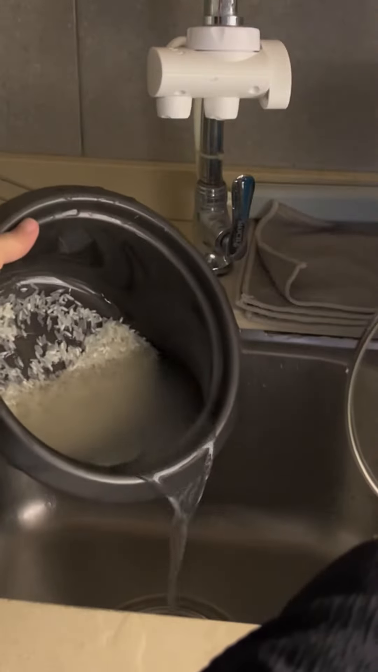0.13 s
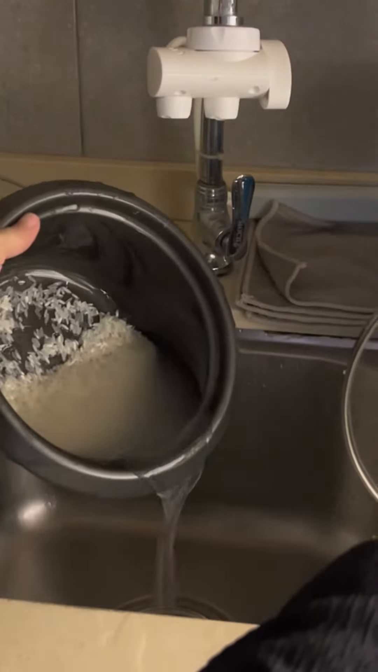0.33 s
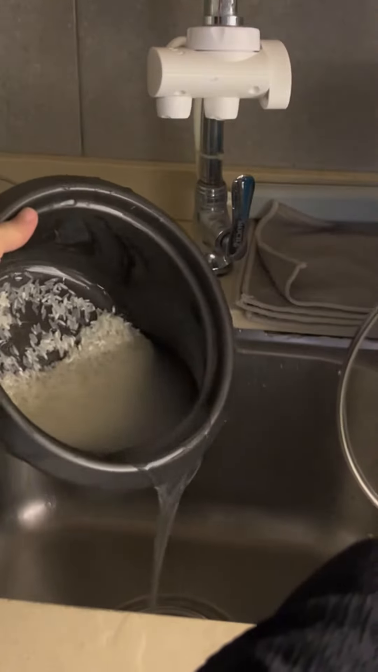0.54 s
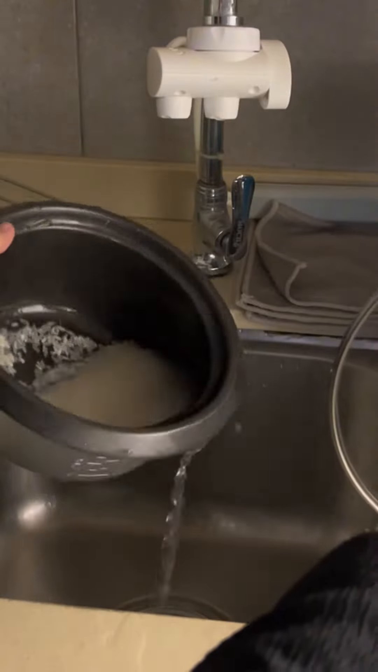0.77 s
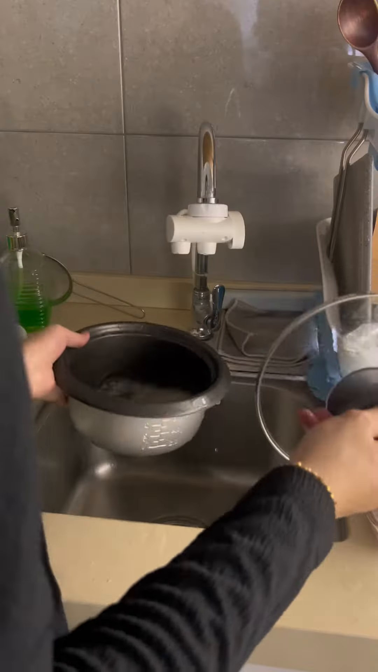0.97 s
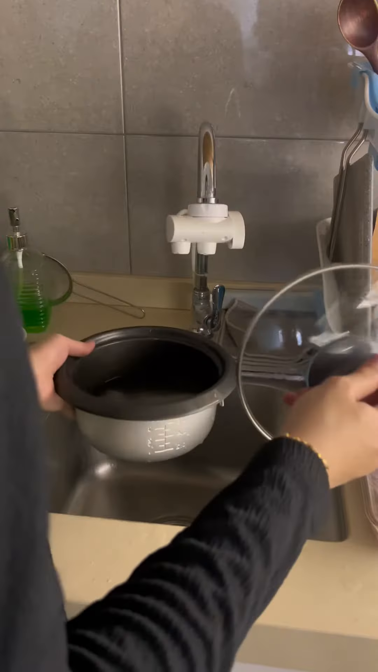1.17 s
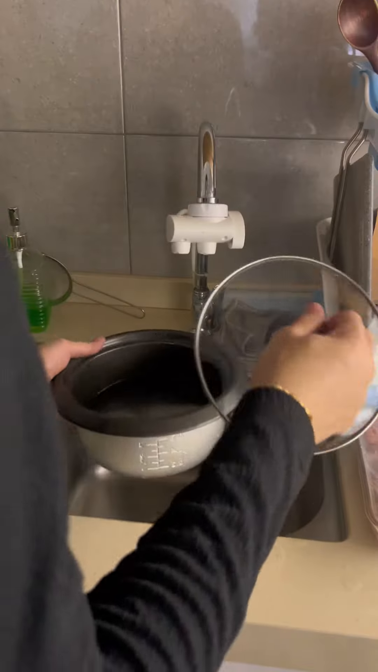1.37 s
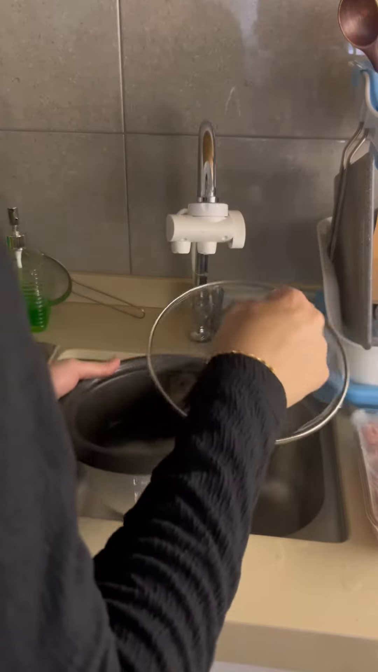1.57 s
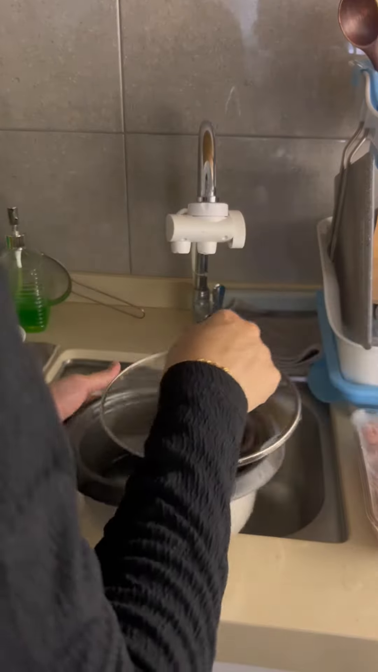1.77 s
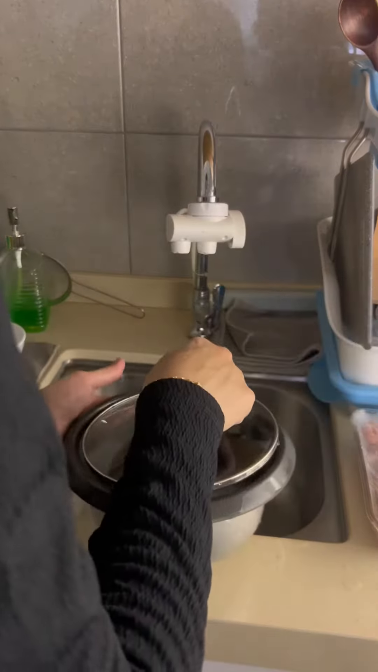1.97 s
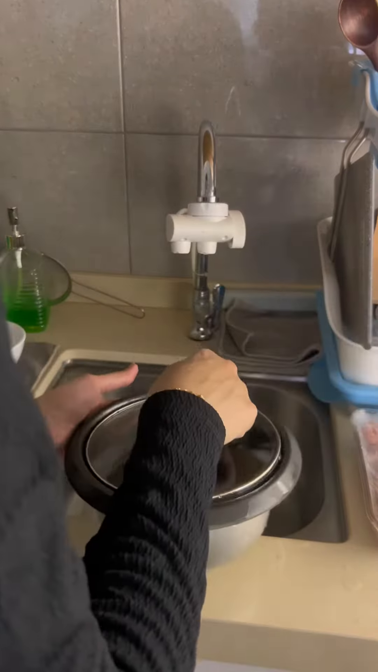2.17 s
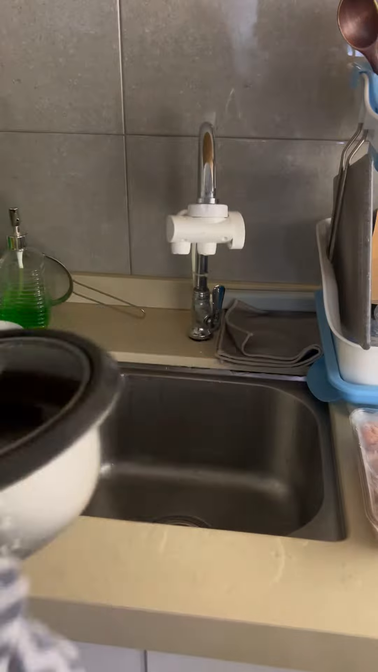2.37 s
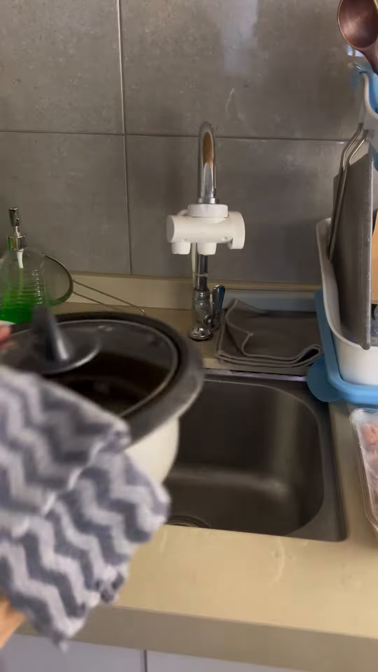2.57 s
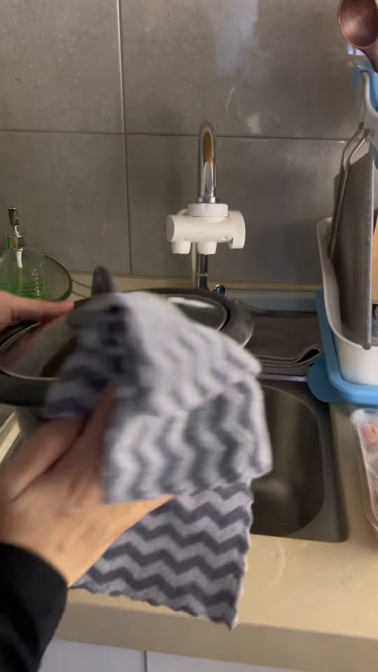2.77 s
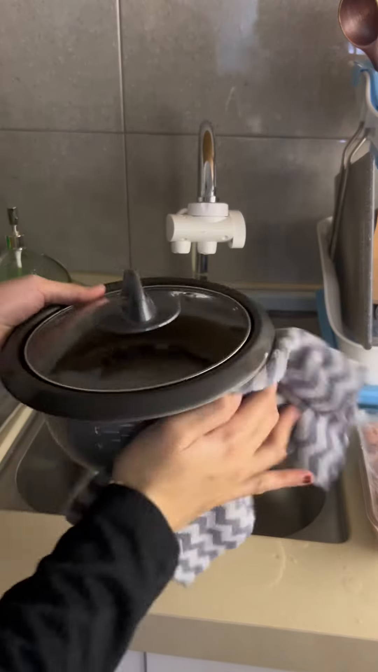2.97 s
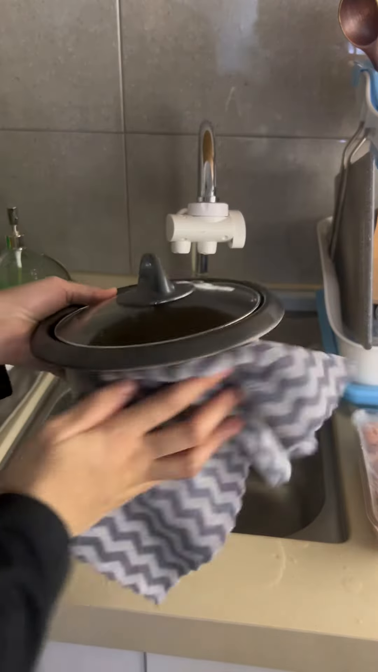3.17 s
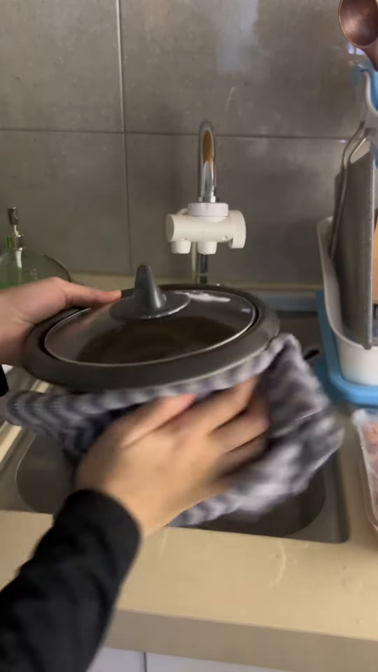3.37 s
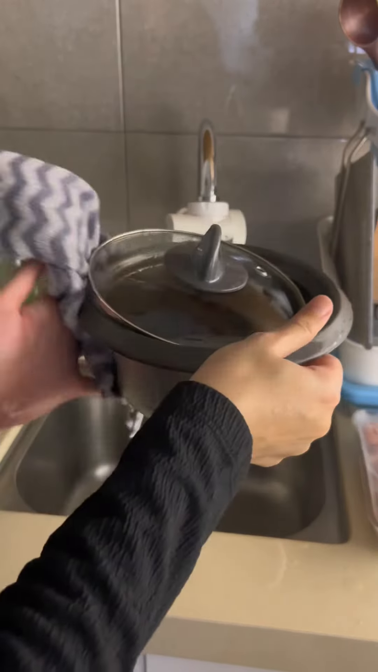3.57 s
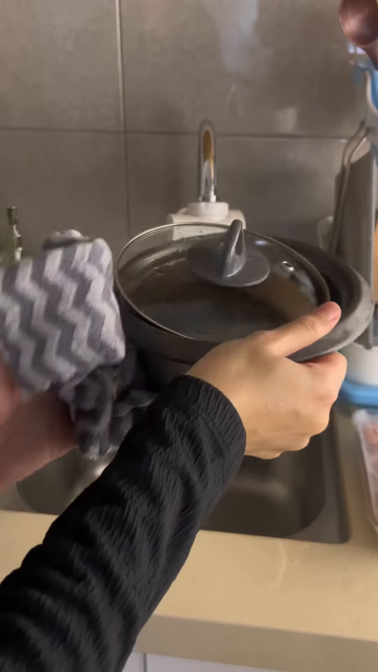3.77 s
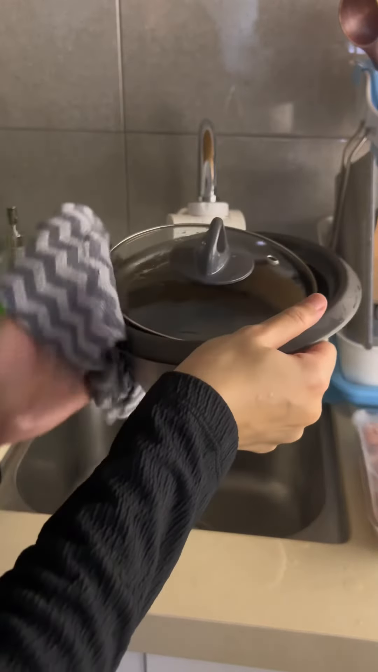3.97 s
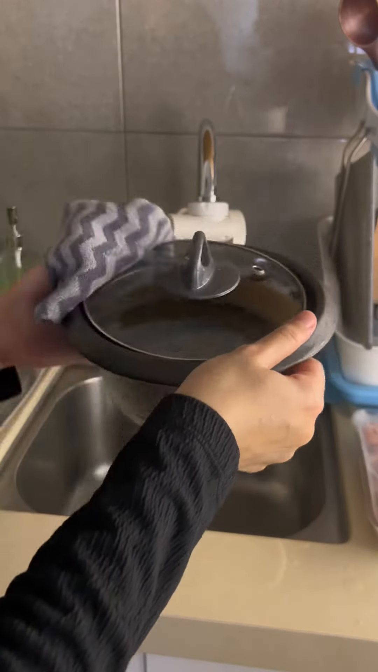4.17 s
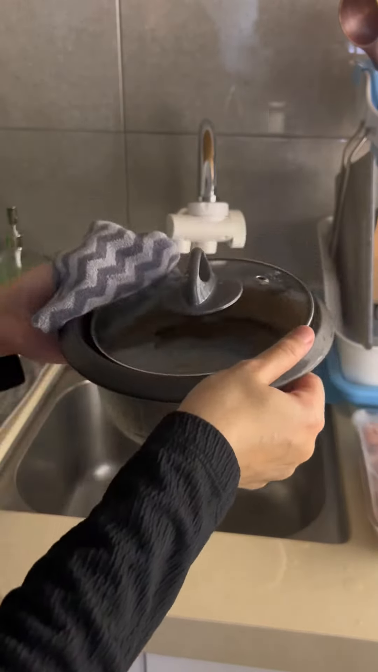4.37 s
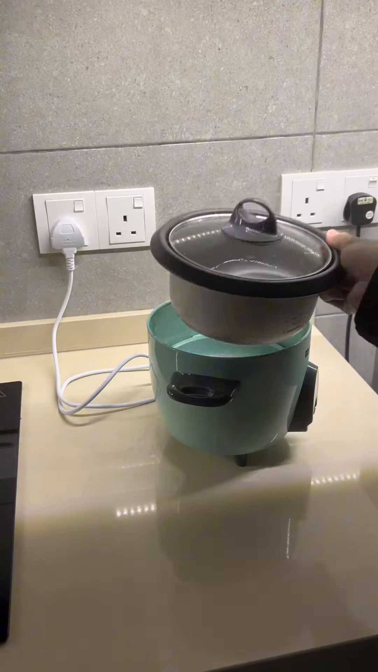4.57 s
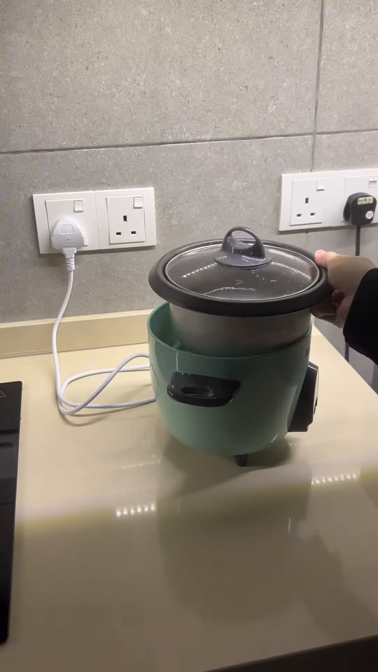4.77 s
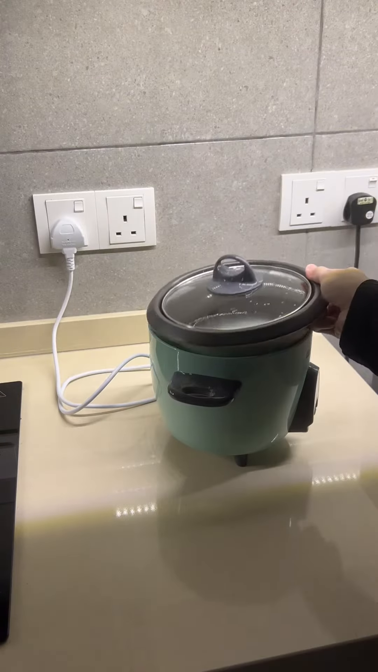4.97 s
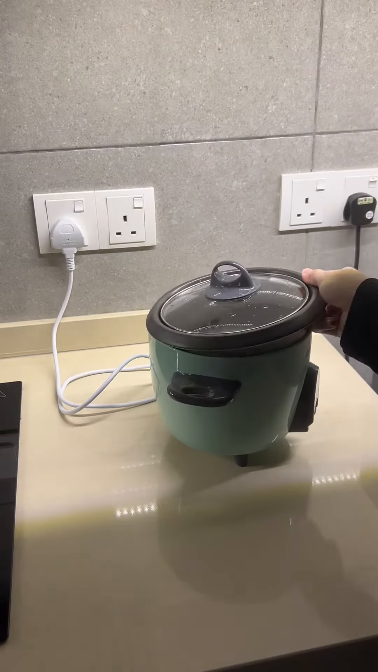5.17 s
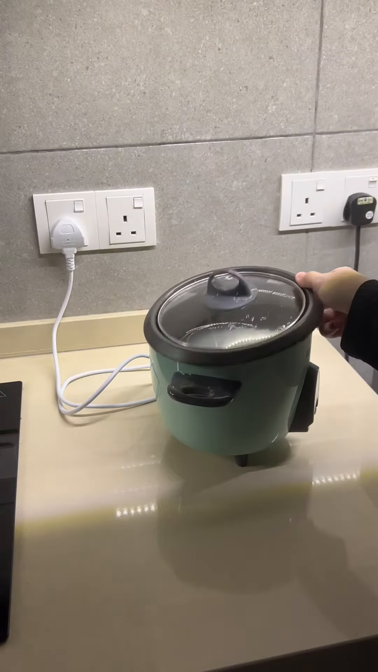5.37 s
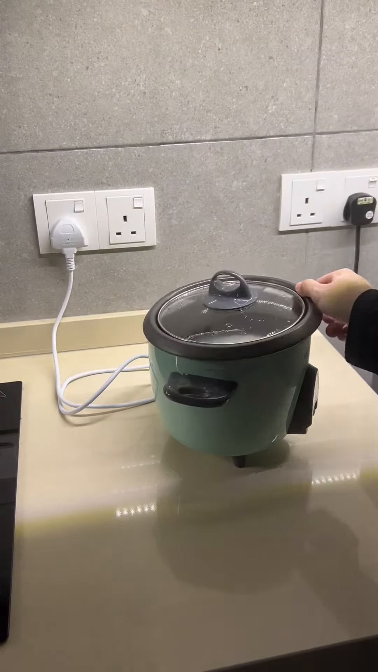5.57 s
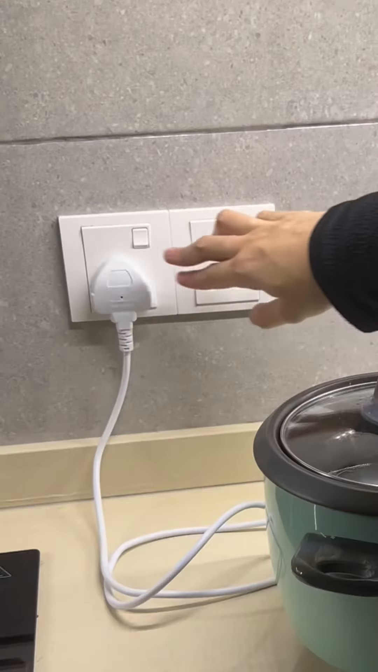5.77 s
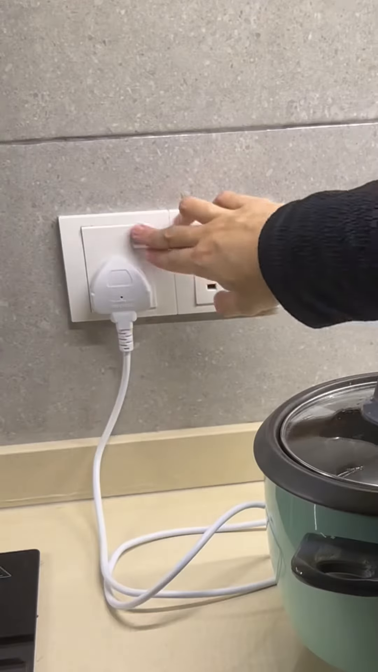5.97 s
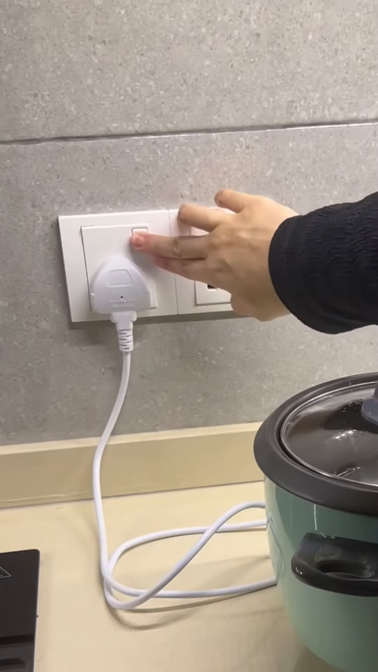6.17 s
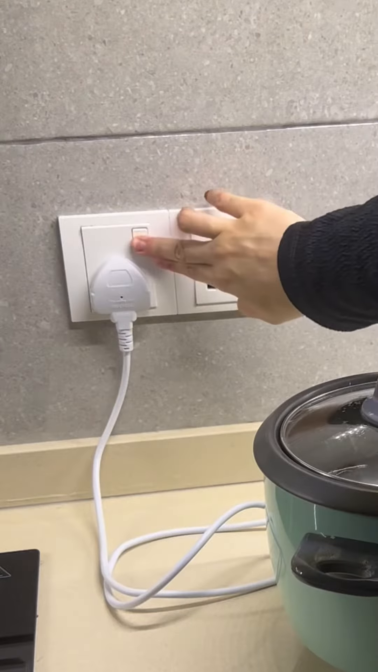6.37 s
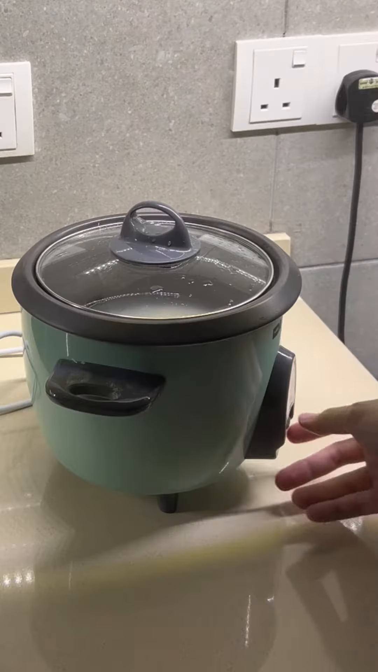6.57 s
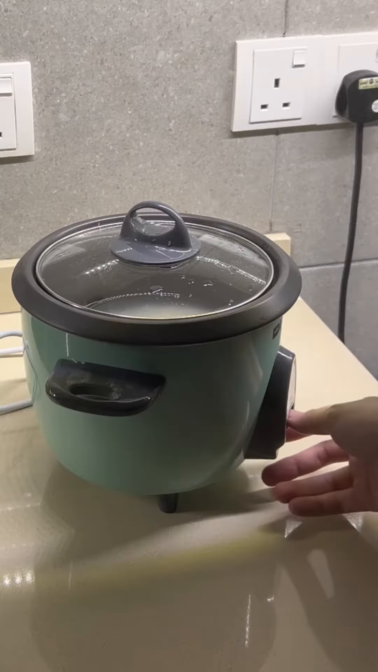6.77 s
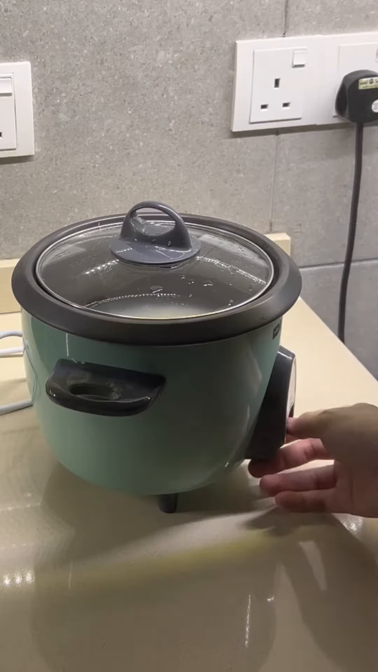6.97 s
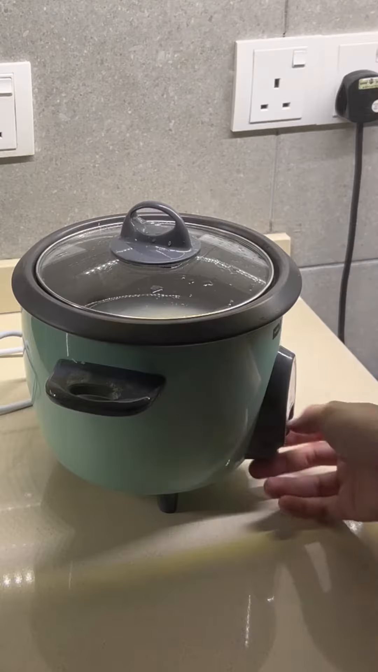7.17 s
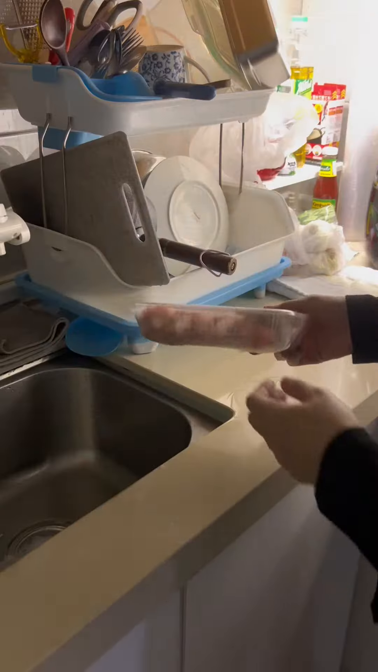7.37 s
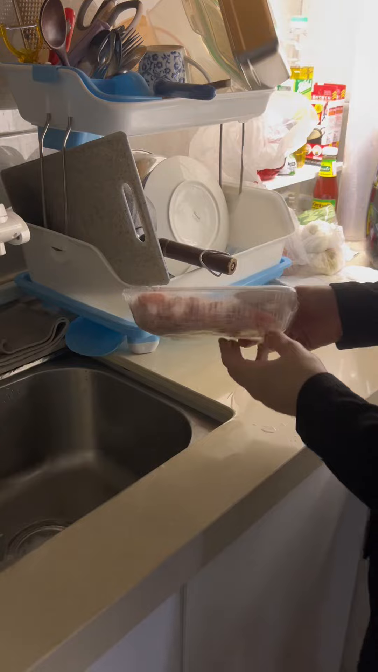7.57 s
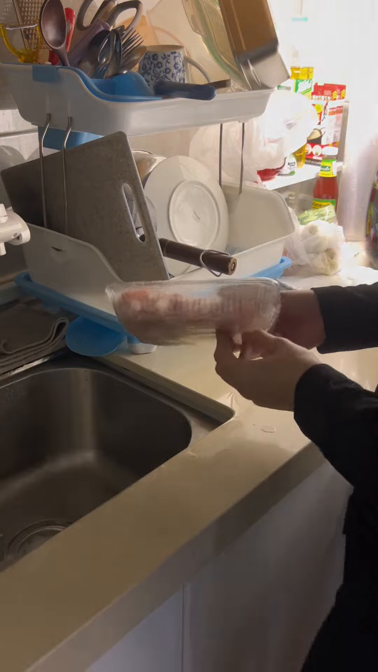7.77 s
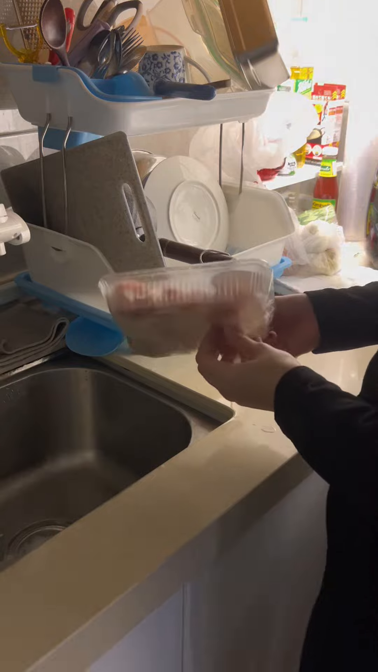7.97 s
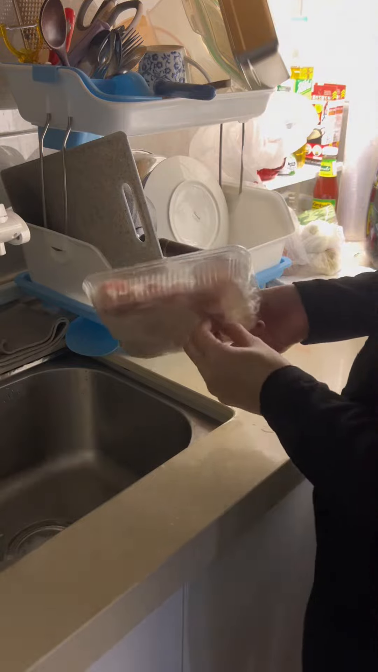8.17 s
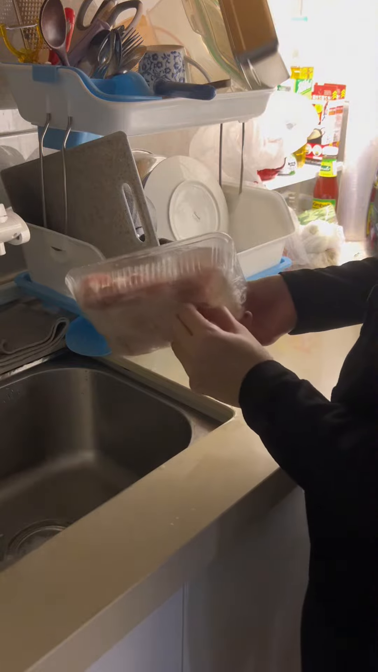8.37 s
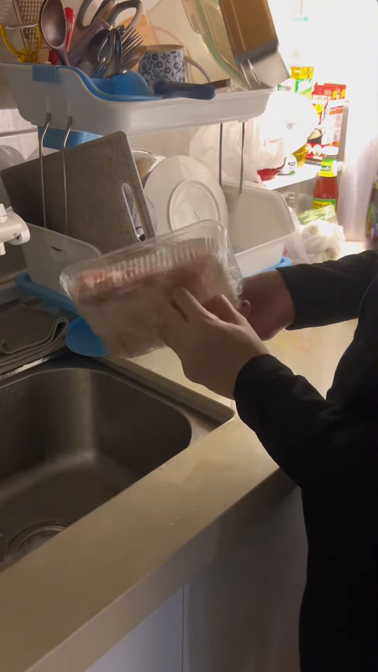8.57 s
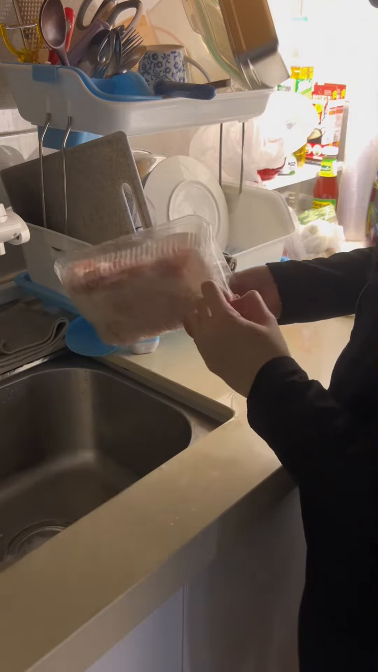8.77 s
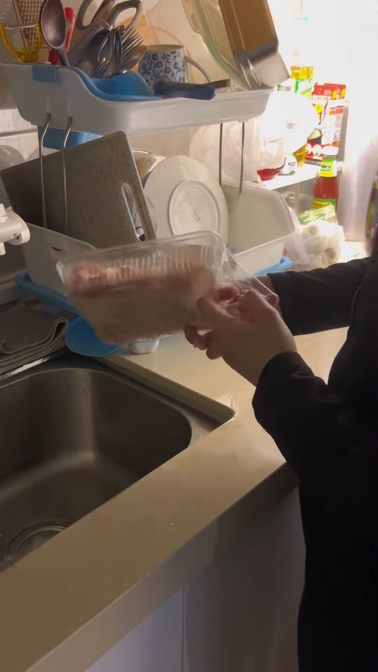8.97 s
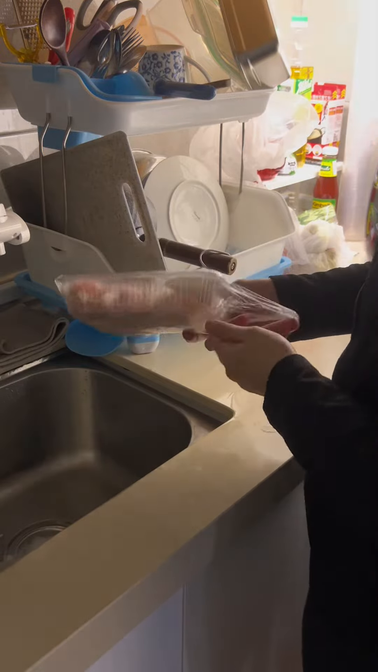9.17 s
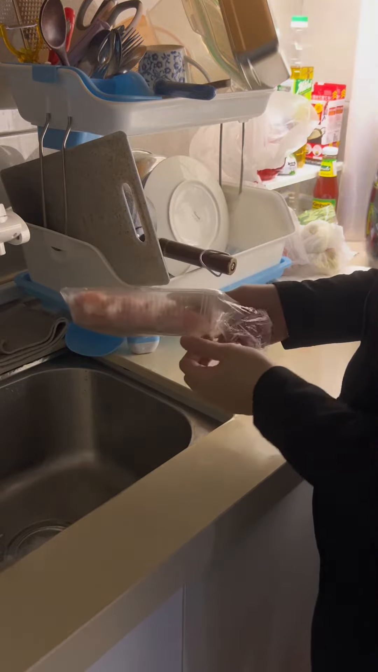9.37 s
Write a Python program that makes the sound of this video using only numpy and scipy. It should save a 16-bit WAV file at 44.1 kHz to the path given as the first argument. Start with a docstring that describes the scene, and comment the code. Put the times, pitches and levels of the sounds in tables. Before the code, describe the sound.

Water dribbles on steel with small bubbling plinks, then a glass lid taps and rings briefly on a metal pot. Soft towel brushing and a flick follow. The pot lands in its cooker with two heavy hollow metallic clatters and a tiny squeak. A sharp switch click, a lever clack and quiet crackly film wrap end it, recorded close over faint humming room air with abrupt background changes.

```python
"""A pot knocks down into its cooker: struck modes of pot, shell and hollow ring after noisy cracks.
Rice water pours into a steel sink (grains, drumming, bubbles), a glass lid rings on the rim, a towel wipes;
a wall switch snaps, the cooker's lever clacks and a film-wrapped tray rustles, as clicks, modes and grains.
A small tiled kitchen with a low hum, heard close from a hand-held microphone in stereo. Six times the
background steps to another level and whatever still rings stops."""
import sys
import numpy as np
from scipy import signal
from scipy.fft import rfft, irfft, next_fast_len
from scipy.io import wavfile
from scipy.ndimage import uniform_filter1d

SR = 44100
rng = np.random.default_rng(int(sys.argv[2]) if len(sys.argv) > 2 else 0)


def output_pcm(signal):
    """Save a mono or channel-first signal as 16-bit PCM at the path in sys.argv[1].

    Samples are clipped to [-1, 1] before scaling.
    """
    pcm = np.clip(np.atleast_2d(signal).T, -1, 1) * 32767
    wavfile.write(sys.argv[1], SR, np.round(pcm).astype(np.int16))


N = 415422
EDGE_HZ = 15800  # upper limit of the band

# stretches of unbroken time, with relative levels:
# (start t/s, room air level/dB, low hum level/dB, sway of the hand-held microphone level/dB)
TIME_STRETCHES = [(0, -44.5, -38, -52), (2.36, -45, -42, -45), (3.498, -45, -54, -48),
                  (4.408, -43.5, -48, -47), (5.679, -44, -45.5, -54.5), (6.469, -45, -66, -65),
                  (7.249, -44.5, -45, -51.5)]
# modes of the hollow between pot and shell: (f/Hz, level/dB, t60/s)
HOLLOW_MODES = [(376, -11, 0.16), (411.7, 1, 0.19), (463, 1.5, 0.16), (490.5, -2, 0.15), (503, -4.5, 0.1),
                (571, -7.5, 0.12)]
# colour of parts rubbing on the cooker: (f/Hz, level/dB per Hz)
RUB_COLOUR = [(100, -7.5), (480, 8), (800, 0), (2000, -8.5), (4000, -9), (8000, -10), (14000, -21),
              (16000, -29)]


def amp(db):
    """Amplitude factor of a level in dB."""
    return 10 ** (np.asarray(db) / 20)


def unit(x):
    """Scales x to rms 1."""
    return x / np.sqrt(np.mean(x ** 2) + 1e-20)


def read(points, hz):
    """Reads a table at hz, interpolating on a log-frequency axis."""
    f, value = np.transpose(points)
    return np.interp(np.log(hz + 1), np.log(f + 1), value)


def wander(shape, size):
    """Slow random movement of rms 1: noise averaged over size samples."""
    return unit(uniform_filter1d(rng.standard_normal(shape), size=size))


def coloured(x, spectrum):
    """Multiplies the spectrum of x by a table, at rms 1."""
    size = next_fast_len(N)
    gain = amp(read(spectrum, np.fft.rfftfreq(size, 1 / SR)))
    return unit(irfft(rfft(x, size) * gain, size)[..., :N])


def noise(spectrum):
    """Two channels of noise with this spectrum."""
    return coloured(rng.standard_normal((2, N)), spectrum)


def causal(x, gain_db, size=4096):
    """Colours x by gain_db(hz) through a minimum-phase filter: nothing sounds ahead of the attack."""
    log_gain = np.log(amp(gain_db(abs(np.fft.fftfreq(size, 1 / SR)))))
    taps = np.fft.ifft(np.exp(np.conj(signal.hilbert(log_gain)))).real
    return signal.fftconvolve(x, taps[None, :size // 2], axes=1)[:, :x.shape[1]]


def age():
    """Time in s since a blow, for the 0.45 s that it is computed."""
    return np.arange(SR * 9 // 20) / SR


def dying(t60):
    """Envelope that falls 60 dB in t60 s."""
    return np.exp(-np.log(1000) * age() / t60)


def swelling(rise_s):
    """Softens an onset: comes up exponentially with time constant rise_s."""
    return 1 - np.exp(-age() / rise_s)


def ring(modes, flutter_db=2, twin_share=.35, split=0.0113, detune=0.0018):
    """Dying sines in close, beating pairs; every blow shifts them a little and their levels flutter."""
    flutter = wander((len(modes), len(age())), size=400)
    out = np.zeros(len(age()))
    for (hz, db, t60), waver in zip(modes, flutter):
        turns = hz * (1 + detune * rng.standard_normal()) * age()
        apart = 1 + split * rng.choice([-1, 1]) * rng.uniform(0.62, 1.93)
        main = np.sin(2 * np.pi * (turns + rng.random()))
        twin = np.sin(2 * np.pi * (turns * apart + rng.random()))
        pair = np.sqrt(1 - twin_share) * main + np.sqrt(twin_share) * twin
        out += amp(db + flutter_db * waver) * dying(t60) * pair
    return out


def resonant(modes, hz, width_hz, valley_db):
    """Gain in dB of a body: a peak at each mode over shallow valleys."""
    peaks = sum(amp(db) ** 2 / (1 + ((hz - f) / width_hz) ** 2) for f, db, *_ in modes)
    return 10 * np.log10(amp(valley_db) ** 2 + peaks)


def room(x, wet_db):
    """Adds the tiled kitchen's tail: noise whose bands each die at their own speed."""
    # decay of the kitchen: (f/Hz, t60/s)
    kitchen_decay = [(100, 1), (500, 0.28), (2000, 0.33), (5000, 0.41), (9000, 0.33), (15000, 0.33)]
    hz, t, z = signal.stft(rng.standard_normal(x.shape), SR, nperseg=256)
    decay = np.exp(-np.log(1000) * t / read(kitchen_decay, hz)[:, None])
    tail = signal.istft(z * decay, SR, nperseg=256)[1][:, :x.shape[1]]
    tail *= swelling(0.0027)
    wet = signal.fftconvolve(x, tail / np.linalg.norm(tail[0]), axes=1)[:, :x.shape[1]]
    return x + amp(wet_db) * wet


def add(mix, s, sound):
    """Places a sound at s; it is cut where its stretch of time ends."""
    end = min([row[0] for row in TIME_STRETCHES if row[0] > s] + [N / SR])
    part = mix[:, round(s * SR):round(end * SR)][:, :sound.shape[1]]
    part += sound[:, :part.shape[1]]


def strokes(rows, attack_s, release_s):
    """Gain of a series of movements: each swells, holds to its length, then falls 60 dB in release_s."""
    gain, t = np.zeros((1, N)), np.arange(2 * SR) / SR
    for s, length, db in rows:
        fade = np.exp(-np.log(1000) * np.maximum(t - length, 0) / release_s)
        add(gain, s, amp(db) * (np.minimum(t / attack_s, 1) * fade)[None])
    return gain[0]


def blows(rows, parts, parts_db, colour, crack_t60, crack_db, tick_db, clatter_db, clatter_t60, wet_db,
          flutter_db, twin_share, uneven_db=3.5, rattle_db=3, follow=0.59, clatter_low_hz=1100):
    """Each blow: a rattling crack through the body, a tick, a clatter of crowded modes and clear rings."""
    out = np.zeros((2, N))
    grid = np.linspace(0, SR / 2, num=130)

    def crowded(hz):
        return read(colour, hz) - 10 * np.log10(1 + (clatter_low_hz / (hz + 100)) ** 4)

    for s, db, treble_db, *rings_db in rows:
        # the part that is struck hardest colours the crack most
        struck = [(hz, mode_db + follow * ring_db, t60)
                  for modes, ring_db in zip(parts, rings_db) for hz, mode_db, t60 in modes]
        # each point of contact favours other clusters of high modes
        uneven = uneven_db * rng.standard_normal(len(grid))

        def body(hz):
            peaks = resonant(struck, hz, width_hz=21, valley_db=-2.5)
            return read(colour, hz) + peaks - 10 * np.log10(1 + (hz / 4500) ** 4)

        def contact(hz):
            low_cut = 10 * np.log10(1 + (3800 / (hz + 100)) ** 4)
            return read(colour, hz) + np.interp(hz, grid, uneven) - low_cut

        # loose parts touch again and again, a few milliseconds apart
        rattle = amp(rattle_db * wander(len(age()), size=130) * (1.5 - np.exp(-age() / 0.044)))
        chatter = rattle * rng.standard_normal((2, len(age())))
        crack = amp(crack_db) * causal(chatter * dying(crack_t60), body)
        touch = dying(crack_t60 * 0.65) + 0.28 * dying(0.0066)  # sharpest at first touch
        tick = amp(tick_db + treble_db) * causal(chatter * touch, contact)
        crowd = rng.standard_normal((2, len(age()))) * dying(clatter_t60)
        clatter = amp(clatter_db) * causal(crowd, crowded)
        rings = sum(amp(part_db + ring_db) * ring(modes, flutter_db, twin_share)
                    for modes, part_db, ring_db in zip(parts, parts_db, rings_db))
        resonance = (crack + clatter + rings) * swelling(0.001)
        add(out, s, amp(db) * room(tick + resonance, wet_db))
    return out


def snaps(rows, colour, gain_db, t60, wet_db):
    """Short clicks of coloured, dying noise that light up the room."""
    out = np.zeros((2, N))
    for s, db in rows:
        click = rng.standard_normal((2, len(age()))) * dying(t60)
        click = causal(click, lambda hz: read(colour, hz))
        add(out, s, amp(db + gain_db) * room(click, wet_db))
    return out


def rustle(gain, colour, db, grains_per_s, grain_t60, grain_share, spread_db, clump_db, clump_s, count=60):
    """Tiny contacts merge into a clumping hiss; the larger ones stand out as grains with their own pitch."""
    first, last = np.flatnonzero(gain)[[0, -1]] / SR
    pitches = np.linspace(500, EDGE_HZ, count)[:, None, None]
    shapes = (np.sin(2 * np.pi * pitches * age()) * dying(grain_t60))[..., :SR // 50]
    hiss = rng.standard_normal((2, N))
    clumps = amp(clump_db * wander(N, size=int(clump_s * SR)))
    contacts = rng.random((int(grains_per_s * (last - first)), 2))
    grains = np.zeros((2, N))
    for k, (when, chance) in enumerate(contacts):
        size = amp(spread_db * min(-np.log(1 - chance), 4))  # many small, few large
        add(grains, first + when * (last - first), size * shapes[k % count])
    grains = unit(grains) * np.sqrt((last - first) * SR / N)
    texture = np.sqrt(grain_share) * grains + np.sqrt(1 - grain_share) * hiss
    return amp(db) * gain * clumps * np.std(texture) * coloured(texture, colour)


def sliding(rows, modes, colour, width_hz):
    """Friction keeps a body's modes murmuring for as long as it moves."""
    hz = np.geomspace(50, SR / 2, num=800)
    spectrum = read(colour, hz) + resonant(modes, hz, width_hz, valley_db=-12.5)
    murmur = noise(np.transpose([hz, spectrum]))
    return strokes(rows, attack_s=0.012, release_s=0.14) * murmur


def background(tone_db=-2, wash_db=-3, waver_hz=3, waver_db=3.4):
    """Room air, a hum wavering around 62 Hz, and the microphone's sway, stepping with the stretches."""
    # spectra: (f/Hz, level/dB per Hz)
    air_colour = [(20, -14), (60, 8), (200, 7), (400, 0), (1000, -4.5), (2000, -9.5), (4000, -19),
                  (8000, -30), (14000, -36), (16000, -36)]
    hum_colour = [(20, -30), (40, -5.5), (54, 0.5), (62, -8.5), (72, 4), (90, -14), (200, -38), (500, -80)]
    sway_colour = [(20, -23), (45, 5), (90, 0), (190, 6), (300, -14.5), (450, -15), (1000, -70)]
    start, *levels_db = np.transpose(TIME_STRETCHES)
    stretch = np.maximum(np.searchsorted(start, np.arange(N) / SR, side="right") - 1, 0)
    air_gain, hum_gain, sway_gain = uniform_filter1d(amp(levels_db)[:, stretch], size=200)
    air = air_gain * noise(air_colour)
    pitch = 62 + waver_hz * wander(N, size=4000)
    swell = amp(waver_db * wander(N, size=16000))
    tone = unit(np.sin(2 * np.pi * np.cumsum(pitch) / SR))
    hum = hum_gain * swell * (amp(tone_db) * tone + amp(wash_db) * noise(hum_colour))
    sway = amp(2.0) * sway_gain * noise(sway_colour)
    return air + hum + sway


def microphone_brushes():
    """Something brushes the microphone during the reach for the switch: swells of low rumbling noise."""
    # brushes: (t/s, length/s, relative level/dB)
    brush_times = [(6.055, 0.058, -14.5), (6.2, 0.13, -18), (6.365, 0.022, -22), (6.447, 0.022, -26)]
    # rumble: (f/Hz, level/dB per Hz)
    rumble_colour = [(20, -25), (45, 3), (70, 5.5), (130, 0), (200, -8.5), (330, -22.5), (600, -44.5),
                     (1500, -91)]
    return amp(2.0) * strokes(brush_times, attack_s=0.023, release_s=0.29) * noise(rumble_colour)


def bumps(wet_db=-11):
    """Soft low pushes: three quickly dying modes around one pitch."""
    # dull bumps of the pot, the counter and the hand: (t/s, relative level/dB, middle mode f/Hz, t60/s)
    pushes = [(0.936, -24.5, 124, 0.11), (1.266, -31, 117, 0.09), (1.755, -32, 117, 0.078),
              (2.222, -34.5, 134, 0.11), (3.172, -15, 109, 0.053), (3.326, -27, 86, 0.11),
              (3.421, -28, 103, 0.061), (4.272, -17, 124, 0.048), (4.326, -31.5, 96, 0.14),
              (4.388, -22, 102.4, 0.19), (4.99, -24, 173.5, 0.2), (5.365, -12.5, 121, 0.12),
              (6.221, -13.5, 294, 0.04), (6.932, -32.5, 181.4, 0.12)]
    out = np.zeros((2, N))
    for s, db, hz, t60 in pushes:
        push = sum(amp(part_db) * np.sin(2 * np.pi * hz * ratio * age())
                   for ratio, part_db in [(.68, 4.5), (1, 8.5), (1.55, -2.5)])
        push *= dying(t60) * swelling(0.0081)
        add(out, s, amp(db) * room(np.array([push, push]), wet_db))
    return out


def film_tray():
    """Fingers grip and pull the tray's film: dense short grains, and sharp crinkles as clicks."""
    # grips and pulls: (t/s, length/s, relative level/dB)
    grip_times = [(7.25, 0.32, -71.5), (7.72, 0.042, -67), (8.38, 0.096, -69), (8.52, 0.11, -57.5),
                  (8.645, 0.029, -55.5), (8.74, 0.07, -57), (8.795, 0.03, -63), (8.865, 0.085, -58),
                  (9.07, 0.036, -63)]
    # crinkles: (t/s, relative level/dB)
    crinkle_times = [(7.3292, -47.5), (7.767, -47), (8.1025, -47.5), (8.5047, -39), (8.6194, -48),
                     (8.6785, -41), (8.819, -49), (8.8704, -37.5), (8.9006, -35), (8.9294, -35),
                     (8.947, -49), (9.0004, -38)]
    # spectra of the rustle and of a crinkle: (f/Hz, level/dB per Hz)
    film_colour = [(150, -5.5), (500, 15), (1200, 6.5), (2500, 6), (4200, 3.5), (8000, 2), (10500, -6.5),
                   (13200, 5), (15000, 3), (16500, -20)]
    crinkle_colour = [(200, -8), (1200, -3), (3800, 4.5), (8000, -1.5), (14000, -6), (16000, 0)]
    grip = strokes(grip_times, attack_s=0.023, release_s=0.34)
    film = rustle(grip, film_colour, db=7.5, grains_per_s=3500, grain_t60=0.003, grain_share=0.32,
                  spread_db=2.5, clump_db=0.8, clump_s=0.016)
    return film + snaps(crinkle_times, crinkle_colour, gain_db=-1, t60=0.066, wet_db=-3.5)


def towel():
    """Cloth wipes over the pot as a soft hiss with few grains, and is flicked open once with a click."""
    # wipes over the pot: (t/s, length/s, relative level/dB)
    wipe_times = [(2.37, 0.098, -59.5), (2.49, 0.18, -61.5), (2.68, .12, -61.5), (2.81, .13, -59.5),
                  (3.015, 0.19, -66.5), (3.25, 0.27, -66), (3.5, 0.28, -68.5), (3.84, 0.38, -67)]
    # the towel flicked open: (t/s, relative level/dB)
    flick_times = [(2.7965, -21.5)]
    # spectra of the wipes and of the flick: (f/Hz, level/dB per Hz)
    wipe_colour = [(150, 0), (500, 8.5), (2500, 7), (5000, 3), (8000, 3.5), (13800, 2.5), (15000, 7),
                   (16500, -21)]
    flick_colour = [(200, -9), (900, 1.5), (3200, 1.5), (4500, -8), (7500, -9), (15000, -32)]
    wipe = strokes(wipe_times, attack_s=0.03, release_s=0.21)
    cloth = rustle(wipe, wipe_colour, db=8.0, grains_per_s=1500, grain_t60=0.0038, grain_share=0.12,
                   spread_db=2.5, clump_db=0.8, clump_s=0.079)
    return cloth + snaps(flick_times, flick_colour, gain_db=0.5, t60=0.012, wet_db=3)


def drips():
    """Single drips click on the steel."""
    # drips: (t/s, relative level/dB)
    drip_times = [(0.344, -57), (0.356, -50), (0.467, -43.5), (.595, -48), (0.882, -40), (1.1054, -49),
                  (1.284, -58.5), (1.6773, -50.5)]
    # spectrum of a drip: (f/Hz, level/dB per Hz)
    drip_colour = [(200, -18), (2000, -8), (5000, -5), (8000, 0.5), (14000, -0.5), (16000, -5)]
    return snaps(drip_times, drip_colour, gain_db=2.5, t60=0.062, wet_db=-13)


def pouring(drum_db=9, rise=.3, bubble_t60=0.054, spread_db=3):
    """A thin stream spatters, drums the steel basin and traps bubbles that rise in pitch."""
    # the pot is tipped, first a dribble and then a stream: (t/s, length/s, relative level/dB)
    pour_times = [(.09, 0.27, -66), (.46, 0.061, -56.5), (.55, 0.31, -58.5)]
    # water on steel, and the basin drummed by it: (f/Hz, level/dB per Hz)
    spatter_colour = [(150, -7), (500, 14), (2500, 3), (5000, 6.5), (8000, 2.5), (11000, 2), (13500, 6),
                      (15000, 5), (16500, -21)]
    basin_colour = [(150, -25), (270, 8), (340, -1), (380, 13), (415, -8), (600, -31), (1500, -47)]
    # the largest bubbles: (t/s, level/dB, starting pitch f/Hz)
    large_bubbles = [(.594, -47, 4100), (.697, -47, 5250), (.741, -55, 3470), (.776, -42, 2000),
                     (.786, -49, 3780), (.848, -49.5, 6800)]
    bubbles_per_s, low_hz, high_hz, bubble_db = 170, 1950, 7400, -11  # bubble_db: smallest, over the flow
    flow = strokes(pour_times, attack_s=0.065, release_s=1.0)
    spatter = rustle(flow, spatter_colour, db=1.0, grains_per_s=1800, grain_t60=0.026, grain_share=0.44,
                     spread_db=3.5, clump_db=-0.5, clump_s=0.022)
    drumming = amp(drum_db) * flow * noise(basin_colour)
    plinks, last = np.zeros((2, N)), np.flatnonzero(flow)[-1] / SR
    bubbles = [(s, amp(db), hz) for s, db, hz in large_bubbles]
    for when, pitch, chance in rng.random((int(bubbles_per_s * last), 3)):
        over_flow_db = bubble_db + spread_db * min(-np.log(1 - chance), 2)  # many small, few large
        size = flow[int(when * last * SR)] * amp(over_flow_db)
        bubbles.append((when * last, size, low_hz + pitch * (high_hz - low_hz)))
    for s, size, hz in bubbles:
        tone = np.sin(2 * np.pi * hz * age() * (1 + rise * age()))
        plink = size * dying(bubble_t60) * swelling(.001) * tone
        add(plinks, s, np.array([plink, plink]))
    return spatter + drumming + plinks


def wall_switch():
    """The wall switch snaps over: one very short bright click."""
    # snap: (t/s, relative level/dB)
    snap_times = [(6.4135, -6)]
    # spectrum of the snap: (f/Hz, level/dB per Hz)
    snap_colour = [(200, -33), (1200, -17), (2000, -7), (3900, -5), (5250, 2), (6700, -1.5), (8600, 0.5),
                   (10500, -10), (14000, 2), (16000, -1)]
    return snaps(snap_times, snap_colour, gain_db=1.5, t60=0.017, wet_db=-6.0)


def cooker_lever():
    """The lever scrapes down its slot until it latches: friction murmur, then blows on lever and hollow."""
    # latching, relative levels: (t/s, level/dB, treble/dB, ring of the lever/dB, boom of the hollow/dB)
    latch_blows = [(6.9165, -30, 10.5, -13, -13), (6.9275, -21.5, 1.5, 0, -11), (6.937, -33, 8.5, -8, -3)]
    # modes of the lever: (f/Hz, level/dB, t60/s)
    lever_modes = [(1074, 0, 0.22), (1326, 1.5, 0.11), (1604, -2.5, 0.12), (2020, -11, 0.068),
                   (2140, -4, .06), (2240, 5, 0.03), (2360, -2, 0.23), (2440, 0.5, 0.077), (2850, -8, .11),
                   (3100, -2, 0.054), (3300, -17, 0.11), (3490, -10, 0.22), (4786, -20, 0.22),
                   (5170, -12, .1), (5560, -10, 0.15)]
    # colour of the first crack: (f/Hz, level/dB per Hz)
    latch_colour = [(30, -16), (200, 11), (450, -4), (750, -7), (1400, 1), (1850, -8), (2200, 1),
                    (2500, -2), (2800, -7), (3300, -4.5), (4000, -12), (5200, -6.5), (6500, -7),
                    (8500, -9.5), (10500, -19), (14000, -10.5), (16000, -30)]
    # slides in the slot: (t/s, length/s, relative level/dB)
    slide_times = [(6.856, 0.027, -42), (6.892, 0.022, -32.5)]
    # what the lever rings with as it scrapes: (f/Hz, level/dB)
    scrape_modes = [(474, -5), (2090, 5.5), (3630, 5)]
    clack = blows(latch_blows, (lever_modes, HOLLOW_MODES), parts_db=(-9, 0), colour=latch_colour,
                  crack_t60=0.059, crack_db=12.5, tick_db=12.0, clatter_db=1.5, clatter_t60=0.13,
                  wet_db=-6.5, flutter_db=3.0, twin_share=0.16)
    return clack + sliding(slide_times, scrape_modes, RUB_COLOUR, width_hz=53)


def glass_lid():
    """The lid strikes and slides on the pot's rim: glass, rim and both seated together ring."""
    # clinks, relative levels: (t/s, level/dB, treble/dB, ring of the glass/dB, ring of the rim/dB,
    # ring of both together/dB)
    lid_clinks = [(2.039, -28.5, 9.5, 1, -5, -14), (2.050, -31.5, 9, 4, -1, -21),
                  (2.174, -33, 4.5, -15, 6, -5), (2.180, -41.5, 3, -12, 6, 0),
                  (2.199, -39.5, -4, -19, 9, -11), (2.223, -29, 9, -18, 9, -7),
                  (2.230, -32.5, 1, -25, 10.5, -19), (4.147, -28, -6, -14, -15, 2),
                  (4.157, -35.5, -2, -15, -6, 0.5), (4.186, -30, 3, -21, 0, -5),
                  (4.198, -37, -7, -12, -13, -2), (4.294, -36, -7, -14, -17, -5),
                  (4.386, -27, 7, -22, -6, 4)]
    # modes of the glass, the rim, and the two seated together: (f/Hz, level/dB, t60/s)
    glass_modes = [(422, 5.5, .17), (549, -2, 0.17), (746, -6, 0.18), (994, -2, 0.083), (1096, -1, 0.071),
                   (1384, -3.5, 0.14), (1470, 0, 0.089), (2243, 0, 0.28), (2380, -1, .08),
                   (2490, -16, 0.063), (2990, -4, 0.073), (3185, -10.5, 0.28), (3580, -6, 0.071),
                   (4953, -24, 0.43)]
    rim_modes = [(280, 1.5, 0.043), (543, -6.5, 0.15), (880, -4.5, 0.096), (1104, -1.5, 0.081),
                 (1370, -13.5, 0.23), (1584, -0.5, 0.16), (1817, -2.5, 0.088), (1826, -11, 0.22),
                 (1910, -8, 0.082), (2250, -1, 0.11), (2440, -22, 0.073), (3070, -2.5, 0.072),
                 (3500, -10, 0.063), (5460, -16, 0.086)]
    seated_modes = [(294, 0.5, 0.072), (337.5, 4, 0.12), (650, -17, 0.064), (890, -5.5, 0.08),
                    (1042, -11, 0.14), (1247, -3, 0.063), (1325, 1, .09), (1453, -12, 0.29),
                    (1733, -9, 0.092), (2047, 0, 0.037), (2513, 1, 0.048), (3160, -0.5, 0.043),
                    (3410, -2, 0.04), (4880, -19.5, 0.17)]
    # colour of the first crack: (f/Hz, level/dB per Hz)
    lid_colour = [(100, -8.5), (330, 5), (1500, -1), (2400, -5.5), (2750, -3), (3500, -11), (4200, -13.5),
                  (8000, -15), (14000, -24.5), (16000, -23)]
    # slides on the rim: (t/s, length/s, relative level/dB)
    slide_times = [(2.185, 0.046, -36.5), (4.1, 0.038, -39.5), (4.132, 0.04, -36.5), (4.357, 0.033, -34)]
    clinks = blows(lid_clinks, (glass_modes, rim_modes, seated_modes), parts_db=(-4, -10, -7),
                   colour=lid_colour, crack_t60=0.12, crack_db=7.5, tick_db=1.5, clatter_db=-3,
                   clatter_t60=0.19, wet_db=-11.5, flutter_db=1, twin_share=0.068)
    return clinks + sliding(slide_times, [*rim_modes, *seated_modes], lid_colour, width_hz=19)


def squeaks(judder_db=3):
    """Metal sticks and slips, and sets a few thin resonances of the rim singing unevenly."""
    # the rim catches twice as the pot settles: (t/s, length/s, relative level/dB)
    squeak_times = [(5.514, 0.0087, -45), (5.533, 0.015, -42.5)]
    # thin resonances: (f/Hz, level/dB, width/Hz)
    thin_modes = [(5160, 3.5, 19), (5210, -16, 38), (5860, -1, 134)]
    voice = np.zeros(N)
    for hz, db, width_hz in thin_modes:
        r = np.exp(-np.pi * width_hz / SR)  # pole radius of a two-pole resonator
        poles = [1, -2 * r * np.cos(2 * np.pi * hz / SR), r * r]
        voice += amp(db) * unit(signal.lfilter([1], poles, rng.standard_normal(N)))
    judder = amp(judder_db * wander(N, size=300))
    return strokes(squeak_times, attack_s=0.0056, release_s=0.24) * unit(voice * judder)


def clangs(wet_db=-9):
    """A hard edge-on contact rings the pot's flange for a moment."""
    # the flange is clipped by the lid or by the edge of the shell: (t/s, relative level/dB)
    clang_times = [(2.2235, -40), (4.9855, -14.5)]
    # short-lived modes of the flange: (f/Hz, level/dB, t60/s)
    flange_modes = [(2006, -0.5, 0.064), (3460, -0.5, 0.032), (3670, 3, 0.056)]
    out = np.zeros((2, N))
    for s, db in clang_times:
        clang = ring(flange_modes) * swelling(.001)
        add(out, s, amp(db) * room(np.array([clang, clang]), wet_db))
    return out


def pot_into_cooker():
    """The pot knocks down into the cooker's shell and settles: pot, shell and hollow ring, then murmur."""
    # knocks, relative levels: (t/s, level/dB, treble/dB, ring of the pot/dB, ring of the shell/dB,
    # boom of the hollow/dB)
    pot_knocks = [(4.627, -20.5, -3.5, -22.5, -1, -7), (4.648, -25.5, -1, -22, 1, -4),
                  (4.804, -37, -20, -20, 5, 0.5), (4.9848, -13, 9.5, 1, -18, -4),
                  (4.9895, -13, -9.5, -8, -2.5, 3.5), (4.999, -19, -11.5, 2, -12.5, -8.5),
                  (5.352, -30.5, 18, -10, -9, -3.5), (5.357, -7.5, 7.5, 0, -1, -1.5),
                  (5.3605, -14, 10.5, -1.5, -5, -5.5), (5.378, -13.5, 0, -2.5, -1, -3.5),
                  (5.398, -21, -5, 1.5, 2.5, -8), (5.412, -24, -8.5, 1, -7, 1),
                  (5.449, -31.5, -4, 4, -1, 4.5), (5.542, -39.5, -9, 3, -1, 6),
                  (5.597, -35.5, -9, -11, -10, 4.5), (5.652, -32, 3, -14, -7, 2),
                  (5.671, -35.5, 2, 0.5, -2, 4.5)]
    # modes of the pot and of the cooker's shell: (f/Hz, level/dB, t60/s)
    pot_modes = [(1080, -5, 0.28), (1365, -9, 0.23), (1520, -3.5, 0.156), (1633, -7, 0.31),
                 (1920, -3.5, 0.11), (2216, 1.5, 0.12), (2330, -2, 0.2), (3140, -5, 0.2), (3200, -5, .14),
                 (3530, -6.5, 0.11), (3630, -4.5, 0.181), (3660, -8, 0.17), (3860, -10, .22),
                 (4560, -15, 0.21), (4640, -10, 0.089), (4890, -12.5, 0.18), (5600, -12, 0.22)]
    shell_modes = [(827, -13.5, 0.11), (888, -9.5, 0.061), (961, -11, 0.32), (1070, -5, .12),
                   (1202, -8.5, 0.18), (1363, -16, 0.26), (1473, -3.5, 0.13), (1690, -10, .3),
                   (1756, -9, 0.38), (1797, -2, 0.17), (2208, -7, 0.14), (2478, -11, .14),
                   (3070, -8.5, 0.13), (3800, -20.5, .22)]
    # colour of the first crack: (f/Hz, level/dB per Hz)
    pot_colour = [(30, -13.5), (70, 3.5), (240, 6), (450, 6.5), (750, -2), (1300, 0.5), (1800, 1),
                  (2800, -8.5), (3300, -10.5), (4000, -13), (5000, -9.5), (6000, -15.5), (7600, -10),
                  (10000, -18.5), (14000, -15.5), (16000, -32.5)]
    # the pot settling in its shell: (t/s, length/s, relative level/dB)
    slide_times = [(5.515, 0.044, -34.5), (5.6, 0.036, -41), (5.652, 0.018, -32)]
    knocks = blows(pot_knocks, (pot_modes, shell_modes, HOLLOW_MODES), parts_db=(-15, -14.5, -6),
                   colour=pot_colour, crack_t60=0.054, crack_db=8.0, tick_db=8, clatter_db=-0.5,
                   clatter_t60=0.15, wet_db=-9.5, flutter_db=3, twin_share=0.27)
    return knocks + sliding(slide_times, [*HOLLOW_MODES, *pot_modes], RUB_COLOUR, width_hz=36)


def scene():
    """Everything that sounds in the kitchen, from the background to the pot."""
    mix = background() + microphone_brushes() + bumps()
    mix += film_tray() + towel()
    mix += drips() + pouring()
    mix += wall_switch() + cooker_lever()
    mix += glass_lid() + squeaks() + clangs()
    return mix + pot_into_cooker()


def record(dry, ceiling=0.87):
    """Left and right are nearly the same, offset in phase and level; peaks round off; a band limit."""
    # level of the difference between left and right: (f/Hz, level/dB)
    difference_level = [(50, -15.5), (150, -19), (450, -6.5), (1000, -2), (3500, -11), (5000, -4),
                        (6000, -35.5), (8000, -38), (15000, -45)]
    # phase offset between left and right: (f/Hz, phase/rad)
    phase_offset = [(0, 0), (200, -.25), (900, -.6), (1700, 0), (2700, 1.7), (3500, 1.3), (5200, 1.4),
                    (6000, 3.14), (7600, 6), (8800, 6.6), (10400, 9.42), (11900, 12.3), (13200, 12.8),
                    (14900, 15.7), (17000, 18.5)]
    # by how much the left is louder: (f/Hz, level/dB)
    left_balance = [(100, 0.6), (900, 1.5), (1800, 0.5), (3000, 0), (4500, -1.5), (5500, -1), (9000, -1)]
    size = next_fast_len(N + 4096)
    hz = np.fft.rfftfreq(size, 1 / SR)
    left, right = rfft(dry, size)
    middle = (left + right) / 2
    difference = (left - right) / 2 * amp(read(difference_level, hz))
    # half of the phase and level offset goes to each channel
    turn = np.exp(.5j * np.interp(hz, *np.transpose(phase_offset)))
    turn = turn * amp(read(left_balance, hz) / 2)
    stereo = irfft(np.array([(middle + difference) * turn, (middle - difference) / turn]), size)[:, :N]
    stereo = stereo / (1 + (stereo / ceiling) ** 4) ** .25
    band = signal.firwin(511, EDGE_HZ, window=("kaiser", 9), fs=SR)
    return signal.oaconvolve(stereo, band[None], "same")


dry = scene()
out = record(dry)
output_pcm(out)
```